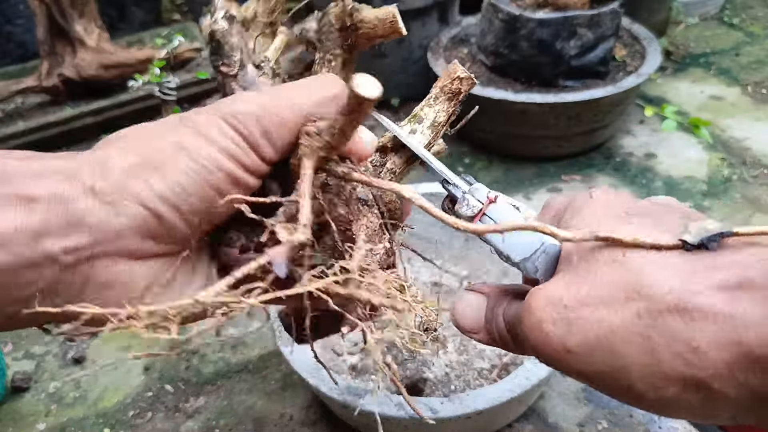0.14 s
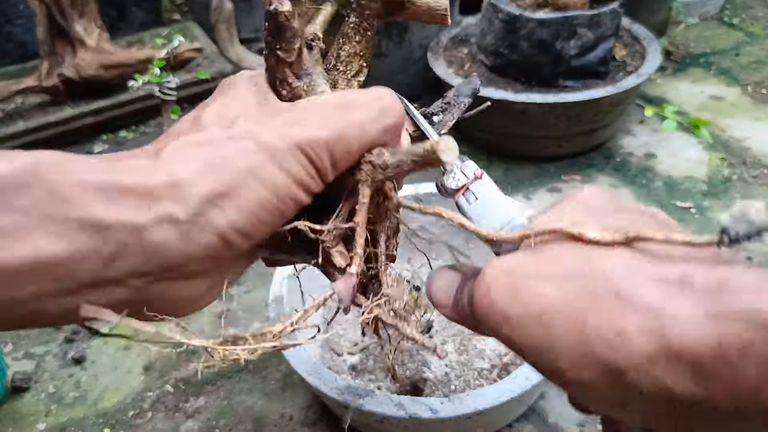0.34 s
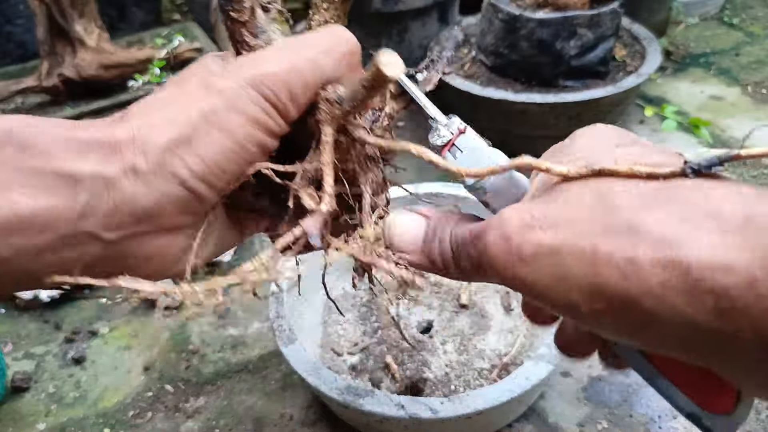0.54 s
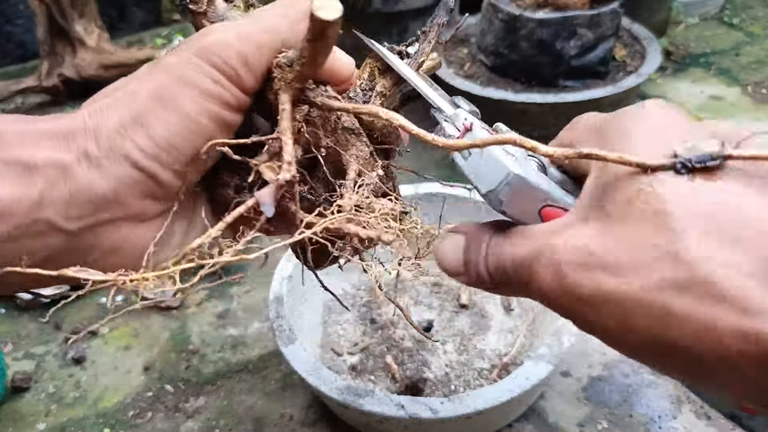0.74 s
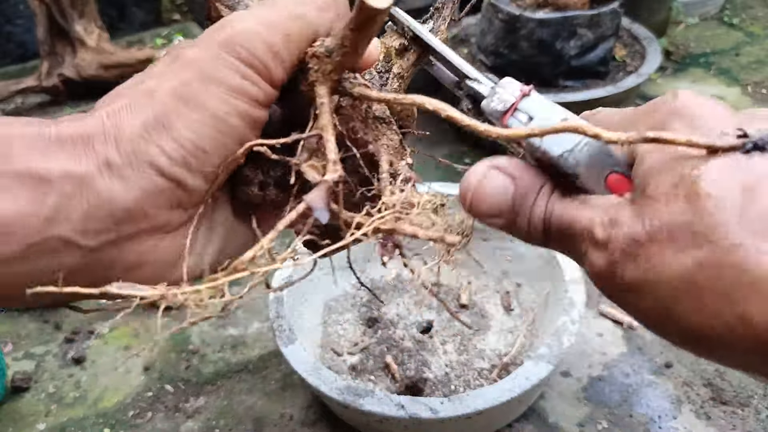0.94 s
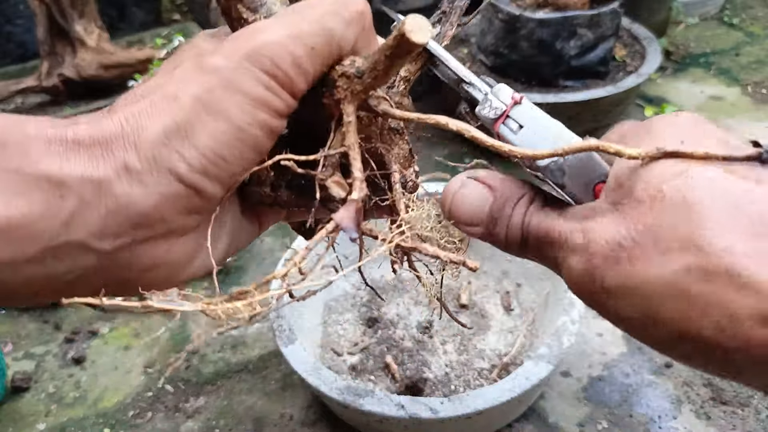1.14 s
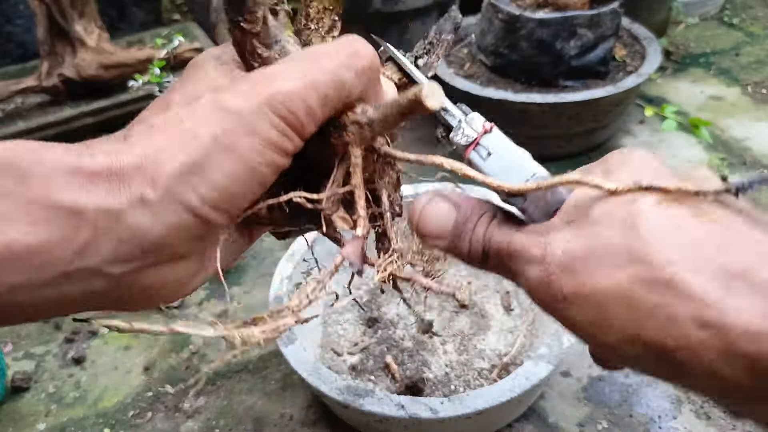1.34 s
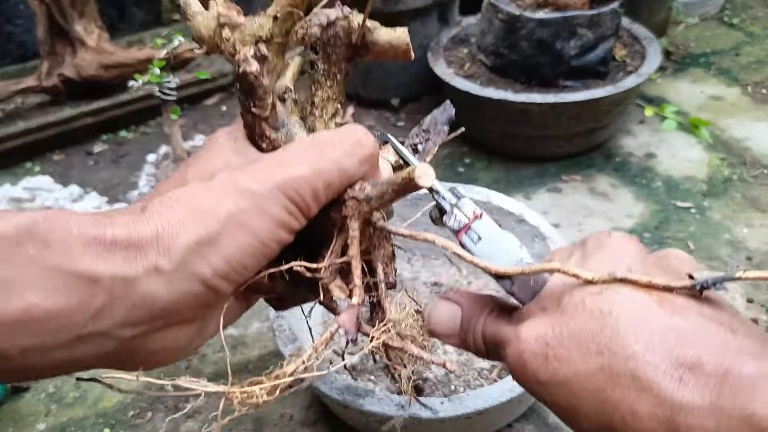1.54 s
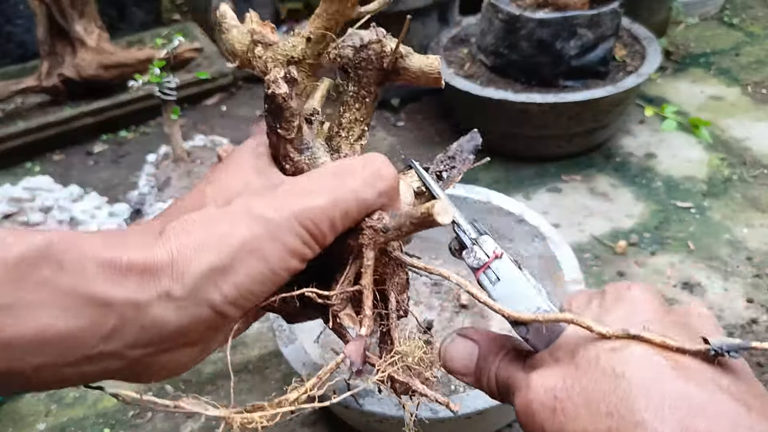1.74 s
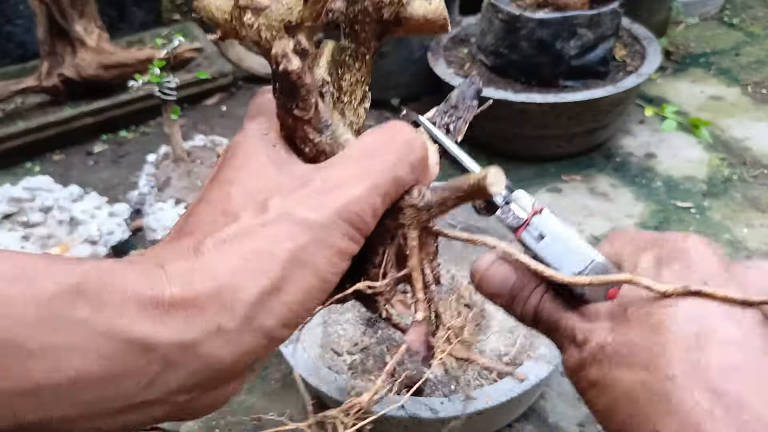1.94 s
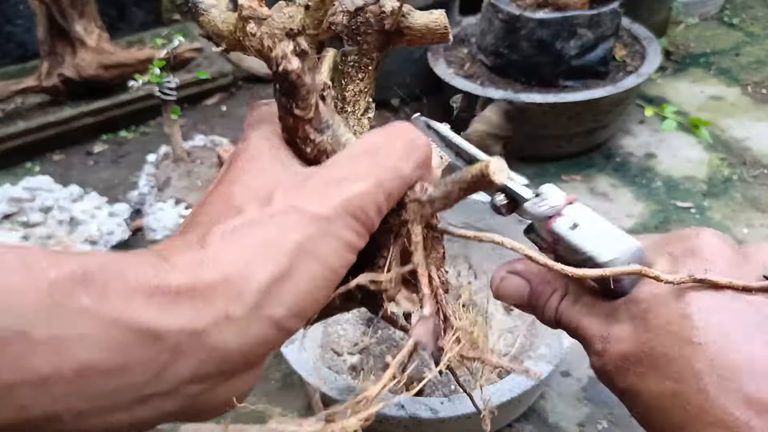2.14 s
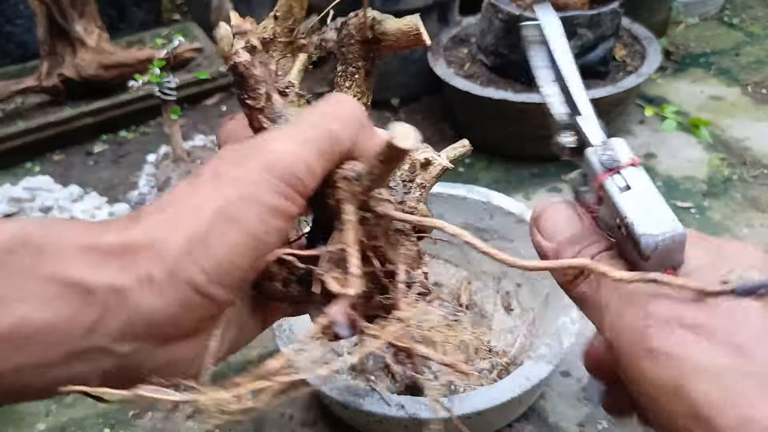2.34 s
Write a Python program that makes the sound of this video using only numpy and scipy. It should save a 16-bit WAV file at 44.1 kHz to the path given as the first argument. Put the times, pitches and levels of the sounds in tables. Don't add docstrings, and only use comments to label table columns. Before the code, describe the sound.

Pruning shears crunch and snap through woody roots, with metallic ticks in a quiet walled yard

```python
import sys
import numpy as np
from scipy import signal
from scipy.fft import rfft, irfft
from scipy.io import wavfile
from scipy.ndimage import uniform_filter1d

SR = 44100
rng = np.random.default_rng(int(sys.argv[2]) if len(sys.argv) > 2 else 0)


def generate_wav(sig):
    pcm = np.round(np.clip(np.atleast_2d(sig).T, -1, 1) * 32767).astype(np.int16)
    wavfile.write(sys.argv[1], SR, pcm)


def linear_from_db(decibels):
    return 10 ** (np.asarray(decibels, float) / 20)


N = 110250


def evened(x):
    return x / np.sqrt(np.mean(x ** 2) + 1e-20)


def smooth_noise(length, window):
    return evened(uniform_filter1d(rng.standard_normal(length), window))


def read(points, hz):
    f, value = np.transpose(points)
    return np.interp(np.log(hz + 1), np.log(f + 1), value)


def follow(points):
    return np.interp(np.arange(N) / SR, *np.transpose(points))


def add(mix, start_s, sound):
    part = mix[round(start_s * SR):][:len(sound)]
    part += sound[:len(part)]


def resonate(x, hz, width_hz):
    turn = np.exp(2j * np.pi * np.cumsum(hz * np.ones(len(x))) / SR)
    r = np.exp(-np.pi * width_hz / SR)
    return 2 * (turn * signal.lfilter([1 - r], [1, -r], x / turn)).real


def coloured(x, spectrum, patchy_db):
    hz, t, z = signal.stft(x, SR, nperseg=512)
    patches = uniform_filter1d(rng.standard_normal(z.shape), 6, axis=0)
    patches = evened(uniform_filter1d(patches, 10, axis=1))
    gain = linear_from_db(read(spectrum, hz)[:, None] + patchy_db * patches)
    return evened(signal.istft(z * gain, SR, nperseg=512)[1][:N])


def rustle():
    # time_s [s], level_db [dB]
    stir = [(0, -53), (.07, -69.5), (.19, -72.5), (0.639, -63), (0.721, -85), (.93, -70.5), (1.017, -55.5),
            (1.12, -70.5), (1.36, -94.5), (1.401, -63), (1.66, -57.5), (1.83, -73), (1.91, -65),
            (1.97, -72), (2.03, -79), (2.1, -67.5), (2.33, -53), (2.5, -58.5)]
    # pitch_hz [Hz], level_db [dB per Hz]
    spectrum = [(88, -49.5), (150, -24), (406, 5.5), (601, -5), (1600, -4.5), (2810, 0), (4320, -5),
                (8070, -24), (16000, -22)]
    grains_per_s, spread_db = 5700, 0.5
    sizes = linear_from_db(spread_db * np.minimum(rng.exponential(1, N), 5))
    grains = sizes * (rng.random(N) < grains_per_s / SR) * rng.choice([-1., 1.], N)
    clumps_db = 2.1 * smooth_noise(N, 500)
    return coloured(grains, spectrum, patchy_db=0.0) * linear_from_db(clumps_db + follow(stir))


def grip():
    # time_s [s], level_db [dB]
    pressure = [(0, -64.5), (.3, -65.5), (.4, -52.5), (.6, -62.5), (1, -62.5), (1.15, -58.5),
                (1.247, -67.5), (1.5, -74), (1.7, -56.5), (2, -63.5), (2.15, -63), (2.25, -62.5),
                (2.4, -52), (2.5, -57)]
    # pitch_hz [Hz], level_db [dB per Hz]
    spectrum = [(50, -8.5), (110, 7), (200, -6.5), (420, -9.5), (700, -15), (1500, -64.5)]
    return coloured(rng.standard_normal(N), spectrum, patchy_db=2.26) * linear_from_db(follow(pressure))


def town_hum():
    # pitch_hz [Hz], level_db [dB per Hz]
    spectrum = [(40, -5), (110, 3), (300, -15), (936, -18), (4370, -22.5), (8140, -41.5), (13000, -51.5),
                (15500, -43.5)]
    return linear_from_db(-61) * coloured(rng.standard_normal(N), spectrum, patchy_db=2.7)


def bird():
    # start_s [s], length_s [s], level_db [dB], pitch_hz [Hz]
    coos = [(0.012, 0.044, -62, 1040), (0.057, 0.062, -62.5, 1201), (0.153, 0.08, -60.5, 1213),
            (0.438, 0.074, -60.5, 1197), (0.561, 0.04, -63, 897), (0.663, 0.14, -65, 1215),
            (1.191, 0.12, -67, 1240), (1.376, 0.045, -66, 1098), (1.549, 0.084, -63.5, 1142),
            (1.659, 0.18, -68, 1205), (1.9, 0.14, -75.5, 1229)]
    blur_width_hz, pitch_arch = 38, 0.074
    out = np.zeros(N)
    for start_s, length_s, level_db, pitch_hz in coos:
        arch = np.sin(np.pi * np.linspace(0, 1, round(length_s * SR))) ** 0.32
        track = pitch_hz * (1 - pitch_arch + pitch_arch * arch)
        blur = evened(resonate(rng.standard_normal(SR // 2)[:arch.size], track, blur_width_hz))
        tone = np.sin(2 * np.pi * np.cumsum(track) / SR)
        add(out, start_s, linear_from_db(level_db) * arch * (tone + 0.93 * blur))
    return out


def blade_slides():
    # start_s [s], length_s [s], level_db [dB], from_hz [Hz], to_hz [Hz]
    strokes = [
        (0.091, 0.038, -70, 4870, 4800),
        (0.902, 0.13, -70.5, 6200, 5000),
        (1.103, 0.22, -62.5, 6200, 3750),
        (1.14, 0.13, -68, 6340, 4670),
        (1.367, 0.29, -61.5, 5600, 3000),
    ]
    width_hz = 730
    out = np.zeros(N)
    for start_s, length_s, level_db, from_hz, to_hz in strokes:
        u = np.linspace(0, 1, round(length_s * SR))
        hz = to_hz + (from_hz - to_hz) * np.exp(-(u / 0.32) ** 2.1)
        noise = rng.standard_normal(SR // 2)[:u.size]
        hiss = resonate(resonate(noise, hz, width_hz), hz, width_hz)
        add(out, start_s, linear_from_db(level_db) * np.sin(np.pi * u) ** 0.67 * evened(hiss))
    return out


def ring(modes, detune, damping):
    t = np.arange(2500) / SR
    rows = []
    for k, ((hz, level_db, t60_s), d) in enumerate(zip(modes, detune)):
        decay = linear_from_db(level_db - 60 * t / (t60_s * damping))
        rows.append((-1) ** k * decay * np.sin(2 * np.pi * hz * d * t))
    return np.array(rows)


def crack(body, burst_s, wood_db, fizz_db):
    # pitch_hz [Hz], level_db [dB], t60_s [s]
    wood = [(323, -8.5, 0.031), (513, -9, 0.045), (680, -3, 0.026), (974, 0, 0.039), (1250, -2.5, 0.012),
            (1786, -3.5, 0.052)]
    # pitch_hz [Hz], level_db [dB], t60_s [s]
    fizz = [(8580, -8.5, 0.0026), (10900, -0.5, 0.0036), (12510, -2.5, 0.0028), (14800, -0.5, .003)]
    clicks_per_s, first_db, detune_share = 5000, 4, 0.002
    t = np.arange(1000) / SR
    clicks = rng.standard_normal(t.size) * (rng.random(t.size) < clicks_per_s / SR)
    spray = clicks * np.exp(-(t / burst_s) ** 2)
    spray[0] = -linear_from_db(first_db)
    detune = 1 + detune_share * rng.standard_normal((3, 14))
    front, side = 0, 0
    for modes, d, level_db in zip((body, wood, fizz), detune, (0, wood_db, fizz_db)):
        rows = ring(modes, d, damping=0.9)
        rung = signal.fftconvolve(spray[None], rows, axes=1)
        full = (np.linalg.norm(rows, axis=1) / np.linalg.norm(rung, axis=1)) @ rung
        full *= linear_from_db(level_db) / abs(full).max()
        front = front + full
        spectra = rfft(ring(modes, d, damping=0.3), axis=1)
        blurred = np.roll(irfft(np.linalg.norm(spectra, axis=0)), 100)
        blurred *= np.linalg.norm(full) / np.linalg.norm(blurred)
        side = side + np.pad(blurred, (0, t.size - 1))
    return front, side


def shears():
    # pitch_hz [Hz], level_db [dB], t60_s [s]
    cracks = [
        (0.206, -44, 0.004, -14.5, -8),
        (.211, -41.5, .005, -15.5, -11),
        (0.245, -39, 0.005, -23, -19.5),
        (0.3037, -27.5, 0.0021, -12.5, -4.5),
        (.312, -34.5, 0.002, -21.5, -6.5),
        (0.319, -33.5, 0.0071, -5.5, -11),
    ]
    ticks = [
        (.537, -64, 0.0023, -4, 4),
        (0.585, -54, 0.00092, -20, -6),
        (0.657, -62, 0.0014, -21.5, 14),
        (.712, -69.5, 0.00073, -20, 5),
        (.885, -68, .001, -10, 1),
        (.922, -63.5, 0.0028, 15, -27),
        (1.973, -62, 0.0024, 6.5, -35),
        (1.919, -54, .004, -14, -8),
        (2.011, -64, .001, -20, 2),
        (2.123, -48, 0.0034, -16, -17.5),
    ]
    blade = [(1650, -9, 0.017), (2220, -7.5, 0.015), (2369, -7.5, 0.032), (2710, 3.5, 0.012),
             (3130, -4, 0.011), (3640, -1, 0.0065), (4457, -9, 0.012), (4874, -9.5, 0.017),
             (6024, -2, .008), (7200, -11, 0.005)]
    splits = [
        (0.2166, -24.5, 0.0028, -20.5, -7.5),
        (0.236, -16.5, 0.0012, -33.5, -4),
        (0.2366, -24.5, 0.0036, -31, -21),
        (2.161, -31, 0.0037, -10, -3.5),
        (0.33, -56, 0.0013, -18.5, -2),
        (2.454, -49, .004, -20, -12),
    ]
    fibre = [(2090, -12, 0.023), (2830, 1, 0.015), (3330, 0.5, 0.0073), (3500, -1.5, 0.0035),
             (4800, 4, 0.0066), (5600, -3.5, 0.015), (5840, -2, 0.0087), (7170, -5.5, 0.012)]
    snaps = [
        (.3345, -9, 0.0022, -6.5, -15.5),
        (0.3387, -1.5, 0.0035, -15.5, -18.5),
    ]
    root = [(1300, -13, 0.017), (1680, -3.5, 0.013), (2114, -14.5, 0.02), (2400, 1, 0.015),
            (2870, 4, 0.013), (3300, -5, 0.0057), (3550, -8, 0.029), (3890, -6, 0.011), (4290, -4, 0.021),
            (5010, -11.5, 0.0081), (5840, -5, 0.016), (6500, -9, 0.011), (7620, -17, .009)]
    cuts = [
        (2.1926, -26, 0.017, -10, -5),
        (2.1982, -13, 0.0015, -12, -22),
        (2.1993, -12, 0.0014, -10, -26),
        (2.2005, -2, 0.0016, -29, -18),
        (2.2215, -38, 0.0022, -27, -30),
        (2.2256, -26, .002, -25, -28),
        (2.242, -26, 0.0023, -30, -24),
        (2.2557, -28.5, 0.0025, -37, -30),
    ]
    cut_root = [(1540, -22, 0.024), (1960, -11.5, 0.0067), (2150, -17, 0.024), (2710, 3, 0.013),
                (3700, -1.5, .011), (4030, -9.5, 0.015), (4690, -9, 0.017), (6070, -7, 0.0083),
                (7300, -19, 0.0091)]
    handle = ([(0.6042, -42, 0.00087, -23, -15), (0.6053, -22.5, 0.0025, -20.5, -14.5),
              (0.617, -37, 0.0013, -9, -18)], [(1730, -0.5, 0.011), (2500, 0.5, .012), (3260, -3.5, 0.0099),
              (3880, -18, .015), (5000, -13, .01), (6030, -11, 0.013), (7200, -12, 0.0056)])
    stump = ([(.8066, -19.5, 0.00023, -12.5, -28.5)], [(431, -4.5, 0.023), (960, 7, 0.0043),
             (1650, 6, 0.006), (2090, -1, 0.0089), (3060, -12, 0.015), (3730, -11.5, 0.0054),
             (4800, -11.5, 0.0049), (6360, -19.5, 0.013)])
    bark = ([(0.9971, -30.5, 0.0024, -39, -19.5)], [(500, -6.5, 0.013), (2070, -3, 0.017),
            (3270, 0, 0.0063), (4400, 1, 0.0088), (5800, -15, .01), (6300, -18, 0.014)])
    latch = ([(1.506, -19, 0.0031, -48, -11.5), (1.5954, -41, 0.0015, -15, -28),
             (2.023, -42.5, 0.0034, -9, -22)], [(1770, -17, 0.021), (2300, -9, 0.004), (2690, 0.5, 0.02),
             (3210, -5, 0.009), (3696, -12.5, 0.02), (4360, -8.5, 0.0083), (5440, -17, 0.016),
             (6120, -11.5, 0.0079), (6670, -24, 0.021), (7200, -20, 0.011)])
    chips = ([(2.3512, -26.5, 0.0019, -14.5, -32), (2.3645, -36, 0.0014, -20, -20),
             (2.39, -34.5, .003, -20, -20), (2.404, -34, 0.0023, -7.5, -25)], [(2100, 0.5, 0.0059),
             (3000, 0, 0.0085), (3610, 1.5, 0.0052), (5000, -7, 0.0047), (6200, -16, 0.023)])
    soil = ([(2.3928, -30, 0.0013, -20, -19)], [(2160, 6.5, 0.0054), (2690, 6, 0.0087), (5000, -10, .006),
            (5960, -8, 0.017)])
    groups = [(cracks + ticks, blade), (splits, fibre), (snaps, root), (cuts, cut_root),
              handle, stump, bark, latch, chips, soil]
    out, wall = np.zeros((4, N)), 0
    for events, body in groups:
        for start_s, level_db, burst_s, wood_db, fizz_db in events:
            wall = wall % 3 + 1
            front, side = crack(body, burst_s, wood_db, fizz_db)
            add(out[0], start_s, linear_from_db(level_db) * front)
            add(out[wall], start_s, linear_from_db(level_db) * side)
    return out


def thuds():
    # start_s [s], level_db [dB], pitch_hz [Hz], t60_s [s]
    bumps = [
        (0.342, -37.5, 74.5, 0.11),
        (.829, -38.5, 463, 0.027),
        (.831, -40.5, 324, .05),
        (1.683, -44, 394, 0.041),
        (2.201, -28, 90.5, 0.043),
        (2.313, -45.5, 204.4, 0.48),
        (2.351, -47, 108, 0.6),
        (2.391, -44, 73, 0.21),
    ]
    out, t = np.zeros(N), np.arange(SR // 4) / SR
    for start_s, level_db, pitch_hz, t60_s in bumps:
        wobble = 1 + 0.28 * smooth_noise(t.size, 300)
        swell = np.minimum(t * pitch_hz, 1)
        tone = np.sin(2 * np.pi * pitch_hz * t)
        add(out, start_s, linear_from_db(level_db - 60 * t / t60_s) * wobble * swell * tone)
    return out


def cricket():
    pitch_hz, width_hz, level_db = 9840, 250, -93
    start_s, end_s = 0.59, 1.4
    t = np.arange(N) / SR
    on = uniform_filter1d(1. * (t > start_s) * (t < end_s), 2000)
    line = resonate(resonate(rng.standard_normal(N), pitch_hz, width_hz), pitch_hz, width_hz)
    return linear_from_db(level_db) * on * evened(line)


def yard(x):
    # pitch_hz [Hz], t60_s [s]
    decay = [(200, 0.16), (1000, 0.13), (2500, 0.38), (6000, 0.25), (12000, 0.24)]
    # pitch_hz [Hz], level_db [dB]
    colour = [(200, 3), (1000, 0), (2500, 0), (6000, 3), (8700, -3.5), (15000, 3.5)]
    taps = np.zeros(SR)
    at = np.arange(200, SR - 20, 20)
    strength = linear_from_db(1.4 * smooth_noise(at.size, 8))
    taps[at + rng.integers(0, 20, at.size)] = rng.choice([-1., 1.], at.size) * strength
    hz, t, z = signal.stft(taps, SR, nperseg=256)
    fade = linear_from_db(read(colour, hz)[:, None] - 60 * t / read(decay, hz)[:, None])
    tail = signal.istft(z * fade, SR, nperseg=256)[1]
    return linear_from_db(-13.5) * signal.fftconvolve(x, tail / np.linalg.norm(tail))[:N]


def scene():
    front, *sides = shears()
    echo = sum(yard(side) for side in sides)
    near = front + echo + thuds() + rustle() + grip() + blade_slides()
    far = town_hum() + bird() + cricket()
    return (near + far)[None]


def band_limit(x):
    return signal.sosfilt(signal.butter(12, 17130, fs=SR, output="sos"), x)


def record(dry):
    low_hz, edge_hz = 70, 15900
    thin = signal.sosfilt(signal.butter(3, low_hz, "high", fs=SR, output="sos"), dry)
    low_pass = signal.firwin(255, edge_hz, window=("kaiser", 2.5), fs=SR)
    mix = signal.oaconvolve(thin, low_pass[None], "same")
    return band_limit(mix)


dry = scene()
out = record(dry)
generate_wav(out)
```